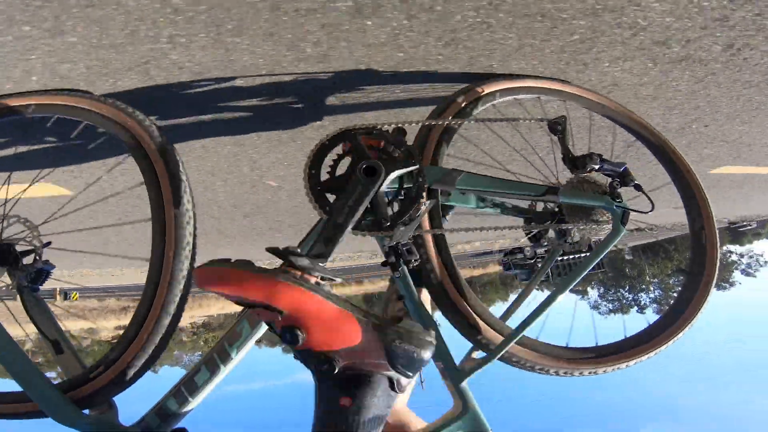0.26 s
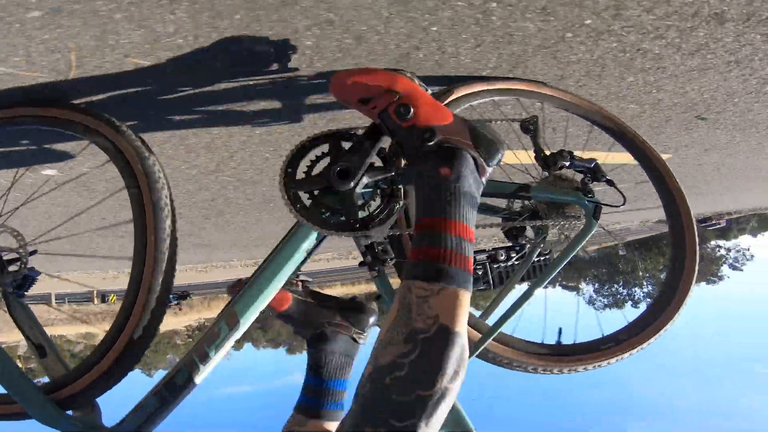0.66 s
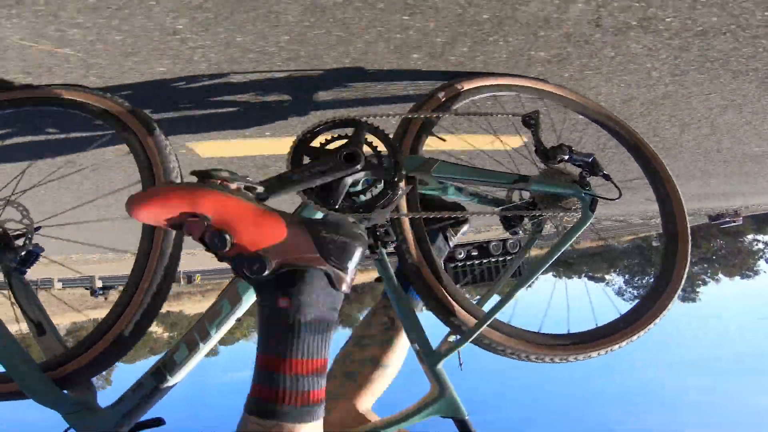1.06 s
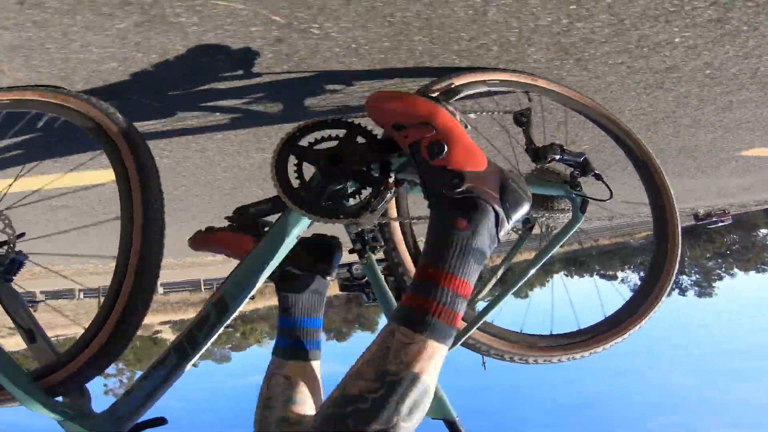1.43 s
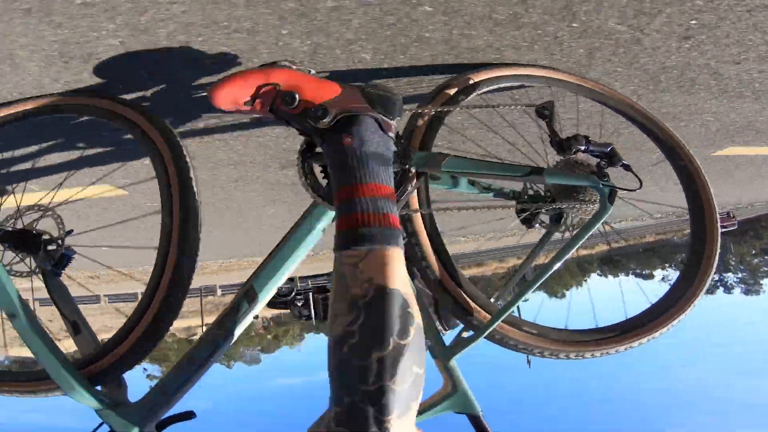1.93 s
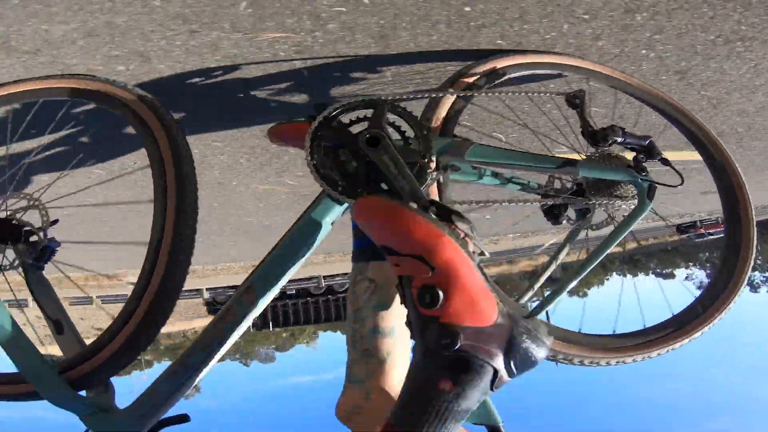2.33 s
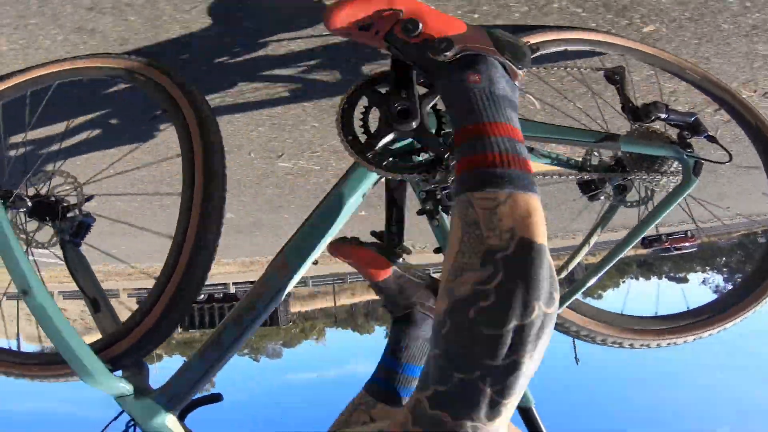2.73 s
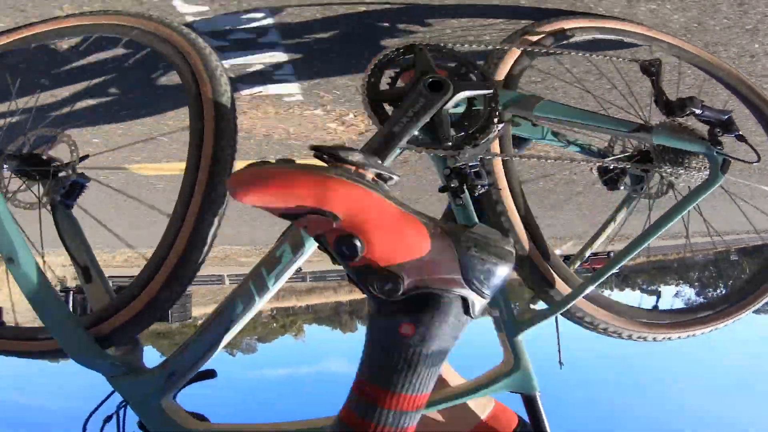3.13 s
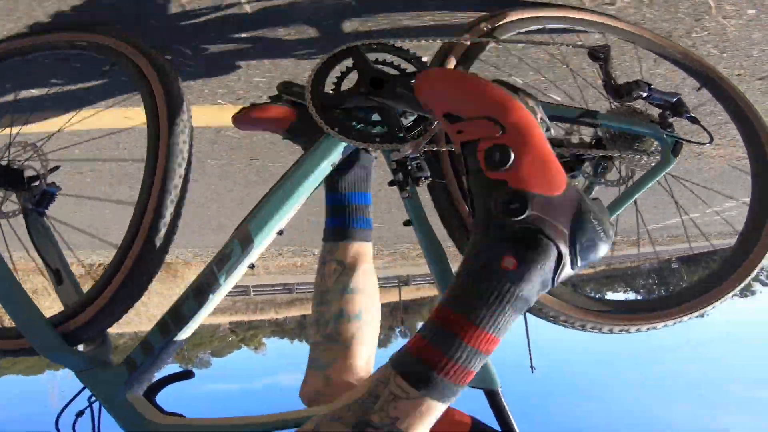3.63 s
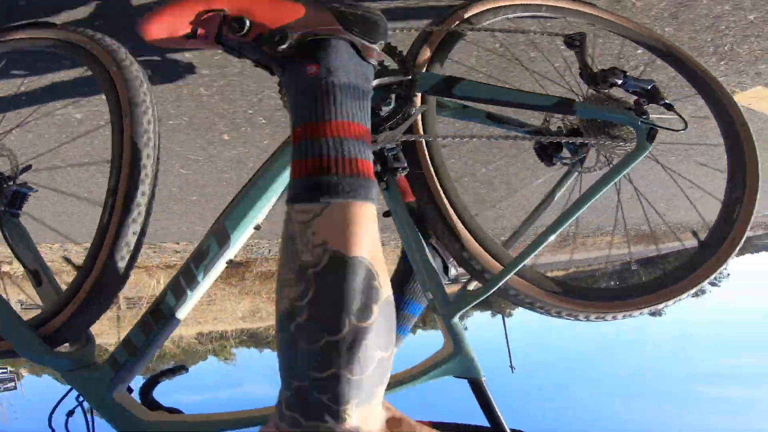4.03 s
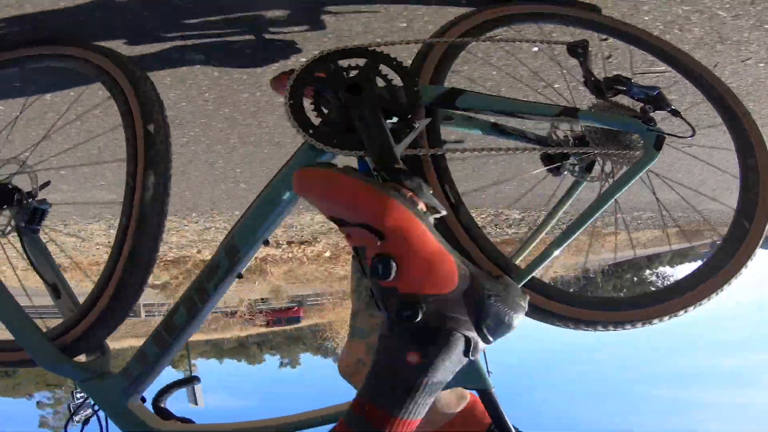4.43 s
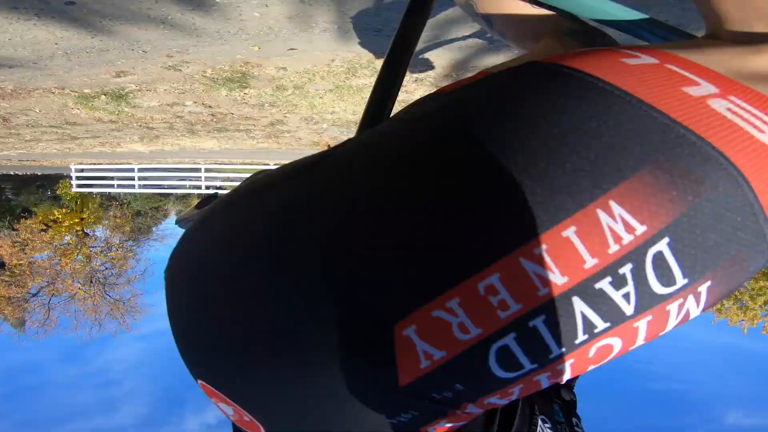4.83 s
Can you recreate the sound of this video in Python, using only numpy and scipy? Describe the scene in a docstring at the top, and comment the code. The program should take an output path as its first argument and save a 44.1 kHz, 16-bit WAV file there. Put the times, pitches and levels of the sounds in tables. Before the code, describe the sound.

Outdoors on a road, a twin-cylinder motorcycle drones loudly nearby, its pitch sagging slightly, then draws away and grows duller. Underneath, bicycle tyres give a quiet steady tread roar and gritty hiss, with small chain and grit ticks, busier after three seconds. Low gusts bump the small, wind-covered microphone on the bike. At the very end a click cuts the motorcycle off and full wind roars and thumps.

```python
"""A twin motorcycle with a narrow angle between its cylinders drones nearby and draws away: overtones, rush and puffs.
A bicycle rolls along an asphalt road: flickering noise makes the tread roar and hiss, short bursts its ticks.
Low noise swelling in gusts is the wind on the small microphone.
At the end the sound cuts with a click to full wind, roaring and thumping; the motorcycle stops at the cut."""
import sys
import numpy as np
from scipy import signal
from scipy.fft import rfft, irfft, next_fast_len
from scipy.io import wavfile
from scipy.ndimage import uniform_filter1d

SR = 44100
rng = np.random.default_rng(int(sys.argv[2]) if len(sys.argv) > 2 else 0)


def unload_audio(sound):
    """Save the sound as a 16-bit wav file, at the path given as the first command line argument."""
    columns = np.transpose(np.atleast_2d(sound))
    # keep every value between -1 and 1, then stretch to whole-number steps
    steps = np.round(np.clip(columns, -1, 1) * 32767)
    wavfile.write(sys.argv[1], SR, steps.astype(np.int16))


N = 223844  # length in samples
CUT_S = 4.9  # the sound cuts to full wind


def undb(db):
    """Turn decibels into a plain factor."""
    return 10 ** (np.asarray(db) / 20)


def level(x, db):
    """Scale a sound to a given average (rms) level in dB."""
    return x * undb(db) / np.sqrt(np.mean(x ** 2))


def columns(rows):
    """Draw every column after the time as a curve, one value a sample."""
    s, *rest = np.transpose(rows)
    return [np.interp(np.arange(N) / SR, s, c) for c in rest]


def walk(rate):
    """Random values held 1 / rate seconds, then smoothed twice; spread near 1."""
    hold = int(SR / rate)
    steps = np.repeat(rng.standard_normal(N // hold + 1), hold)
    smooth = uniform_filter1d(uniform_filter1d(steps, hold), hold)
    return 1.38 * smooth[:N]


def noise(points, flicker_db, rate):
    """Noise of a given spectrum whose half-octave bands flicker each on their own; rms 1."""
    hz, db = np.transpose(points)
    size = next_fast_len(N)
    octave = np.log2(np.maximum(np.arange(size // 2 + 1) * SR / size, 1))
    colour = undb(np.interp(octave, np.log2(hz), db, left=-90, right=-90))
    shaped = rfft(rng.standard_normal(size)) * colour
    out = 0
    for centre in np.arange(3.5, 14, .5):  # in octaves above 1 Hz
        window = np.cos(np.pi * np.clip(octave - centre, -.5, .5)) ** 2
        out = out + irfft(shaped * window, size)[:N] * undb(flicker_db * walk(rate))
    return level(out, 0)


def band(x, hz, width):
    """A resonance: keep what lies around one frequency."""
    return signal.lfilter(*signal.iirpeak(hz, hz / width, fs=SR), x)


def band_twice(x, hz, width):
    """Two equal resonances in a row, for steeper sides."""
    return band(band(x, hz, width), hz, width)


# Engine speed. Each row: time in seconds, engine cycles per second in Hz.
ENGINE_SPEED = [(0.0, 22.47), (0.3, 22.33), (0.7, 22.09), (1.1, 21.86), (1.4, 21.76), (1.9, 21.63),
                (2.5, 21.615), (3.5, 21.595), (4.3, 21.63), (4.9, 21.75)]
# Motorcycle drawing away. Each row: time in seconds, level in dB, distance from 0 (near) to 1 (far).
DRAWING_AWAY = [(0, -21, 0.0056), (0.7, -21, 0.087), (1.4, -22.5, 0.55), (2.1, -24, 0.72), (2.8, -25, 0.78),
                (3.0, -27, 0.9), (3.8, -29, 0.88), (4.3, -28.5, 1), (4.9, -31, 0.99)]
# Exhaust overtones heard near, midway and far.
# Each row: multiple of the engine cycle, strength in dB beside the other overtones.
NEAR_OVERTONES = [(1, -19.5), (2, -26), (3, -19), (4, 1), (5, -0.9), (6, -1), (7, -3), (8, -31), (9, -3.4),
                  (10, -12), (11, -8), (12, -10.5), (13, -8.5), (14, -12), (15, -26), (16, -20.5),
                  (17, -25.5), (18, -34), (19, -30), (20, -39.5), (21, -32), (22, -22.5), (23, -31.5),
                  (24, -33)]
MIDWAY_OVERTONES = [(1, -22.5), (2, -16), (3, -9.5), (4, 2), (5, 1), (6, -3.5), (7, -0.5), (8, -9),
                    (9, -0.05), (10, -23), (11, -15.5), (12, -9), (13, -8), (14, -13.5), (15, -26.5),
                    (16, -17.5), (17, -23), (18, -32.5), (19, -28), (20, -36.5), (21, -29), (22, -26.5),
                    (23, -31), (24, -31.5)]
FAR_OVERTONES = [(1, -6), (2, -9), (3, -8.5), (4, -6.5), (5, 1.5), (6, -5.5), (7, -1.5), (8, -1.5), (9, 0),
                 (10, -29.5), (11, -13), (12, -6.5), (13, -17.5), (14, -10), (15, -19.5), (16, -23.5),
                 (17, -33.5), (18, -27), (19, -28), (20, -28.5), (21, -18), (22, -31), (23, -31.5),
                 (24, -30)]
MIDWAY_AT = .7  # distance
# Noise of the exhaust. Each row: frequency in Hz, relative strength in dB per Hz.
RUSH_SPECTRUM = [(60, -10.5), (100, -8.5), (200, 2), (300, -9), (380, -26)]
# Rings of the silencer. Each row: frequency in Hz, width in Hz, level in dB before distance fades it.
SILENCER_RINGS = [(842, 32, -53), (1780, 290, -67)]
RING_FADE_DB = 16  # the silencer's ring is lost with distance
# Each pair from here on is (near, far). Place in the cycle and strength of the second firing:
SECOND_FIRING, SECOND_SHARE = (.458, .423), (.94, 1.01)
# strength and delay (cycles) of the pipe's return:
RETURN_SHARE, RETURN_CYCLES = (.61, .36), (.246, .226)
# lag of the low overtones (radians per log multiple), pulse turn (radians), lateness (cycles):
LOW_LAG, PULSE_TURN, LATE_CYCLES = (6.8, 4.43), (3.18, 1.6), (.108, .196)
FIRING_SCATTER_DB = (.5, .9)  # from firing to firing
PUFF_KICK = 1.0  # steady push of a puff beside its hiss


def motorcycle():
    """Two uneven firings a cycle: a stack of overtones, a rush between them, gas puffs that ring the silencer."""
    (hz,), (db, far) = columns(ENGINE_SPEED), columns(DRAWING_AWAY)
    far = np.clip(far, 0, 1)
    pairs = SECOND_FIRING, SECOND_SHARE, RETURN_SHARE, RETURN_CYCLES, LOW_LAG, PULSE_TURN, LATE_CYCLES
    second, share, back, delay, lag, twist, late = (a + far * (b - a) for a, b in pairs)
    unsteady = 1 + .0006 * walk(10)
    turn = np.cumsum(hz * unsteady) / SR - late  # engine cycles so far

    tone = 0
    for (k, near_db), (_, midway_db), (_, far_db) in zip(NEAR_OVERTONES, MIDWAY_OVERTONES, FAR_OVERTONES):
        pair = np.angle(1 + share * np.exp(-2j * np.pi * k * second))
        # each firing returns once along the pipe
        bounce = np.angle(1 + back * np.exp(-2j * np.pi * k * delay))
        # the high overtones leave first, the low ones trail
        spread = twist - lag * np.log(k) + .08 * walk(1.4)
        wobble_db = (.6 + 1.1 * far) * walk(4)
        strength_db = np.interp(far, (0, MIDWAY_AT, 1), (near_db, midway_db, far_db))
        wave = np.cos(2 * np.pi * k * turn + pair + bounce + spread)
        tone = tone + undb(strength_db + wobble_db) * wave
    # even out the loudness over half a second
    tone = tone / np.sqrt(uniform_filter1d(tone ** 2, SR // 2))
    tone = tone * undb(np.interp(far, (0, 1), FIRING_SCATTER_DB) * walk(2 * hz.mean()))
    # the rush stands out more with distance
    rush = undb(-19.0 + 6.7 * far) * noise(RUSH_SPECTRUM, 1.0, 3.6)

    puff = sum(g * np.exp(-((turn - at) % 1) / .04) for at, g in ((0, 1), (second, .6)))
    gas = puff * undb(1.4 * walk(40)) * rng.standard_normal(N)
    rings = 0
    for ring_hz, width, ring_db in SILENCER_RINGS:
        rings = rings + level(band_twice(gas + PUFF_KICK * puff, ring_hz, 1.2 * width), ring_db)
    rings = rings * undb(-RING_FADE_DB * far ** 4)
    rasp = level(band_twice(gas, 1500, 1800), -61.5)
    # the rasp follows the distance less than the drone does
    rasp = rasp * undb(0.41 * (db - db.mean()))
    heard = np.arange(N) < CUT_S * SR  # the motorcycle stops at the cut
    return heard * ((tone + rush) * undb(db) + rings + rasp)


# Tyres on asphalt. Each row: time in seconds, level of the roar in dB, level of the hiss in dB.
ROLLING = [(0.0, -43.5, -60), (0.7, -43.5, -59), (2.5, -45, -58.5), (3.4, -44, -57), (4.9, -44.5, -58)]
# Tread roar, then fine hiss. Each row: frequency in Hz, relative strength in dB per Hz.
ROAR_SPECTRUM = [(190, -19.5), (330, -0.5), (390, -2.5), (490, -6.5), (758, -9), (854, -7.5), (1080, -12.5),
                 (1200, -12), (1740, -19), (3000, -31), (3900, -49.5), (6600, -120)]
HISS_SPECTRUM = [(1470, -18), (2500, -2), (3070, -3.5), (3540, -0.5), (3840, 3), (4660, 0), (5810, -4),
                 (6780, -17), (8810, -37), (14900, -120)]
HUM_HZ, HUM_WIDTH_HZ = 585, 45
HUM_DB, HUM_RISE_DB_PER_S = -59, 3  # level halfway through, before it wavers
TREAD_HZ, TREAD_WIDTH_HZ = 1680, 570
TREAD_DB = -16  # crackle against the roar
TREAD_GRAIN_DB, TREAD_LARGEST = 3, 4  # size of a grain step; the biggest grain, in grain steps


def tyres():
    """Tread roar and crackle, a faint wavering hum and a fine gritty hiss, all from filtered noise."""
    roar_db, hiss_db = columns(ROLLING)
    # each grain of grit holds its random loudness for 40 samples
    grit = undb(1.4 * np.repeat(rng.exponential(size=N // 40 + 1), 40)[:N])
    hiss = level(noise(HISS_SPECTRUM, 0.96, 11) * grit, 0)

    hum = level(band_twice(rng.standard_normal(N), HUM_HZ, HUM_WIDTH_HZ), HUM_DB)
    from_middle_s = (np.arange(N) - N / 2) / SR
    hum = hum * undb(1.5 * walk(2) + HUM_RISE_DB_PER_S * from_middle_s)

    grain_sizes = np.minimum(rng.exponential(size=N // 60 + 1), TREAD_LARGEST)
    grains = undb(TREAD_GRAIN_DB * np.repeat(grain_sizes, 60)[:N]) * rng.standard_normal(N)
    crackle = level(band_twice(grains, TREAD_HZ, TREAD_WIDTH_HZ), TREAD_DB)
    roar = noise(ROAR_SPECTRUM, 1.3, 10)
    return hum + undb(roar_db) * (roar + crackle) + undb(hiss_db) * hiss


# Wind before the cut. Each row: frequency in Hz, relative strength in dB per Hz.
WIND_SPECTRUM = [(15, -17), (35, -5.5), (60, -0.5), (95, -5), (150, -11), (260, -25), (400, -43.5)]
BREEZE_DB, BREEZE_RISE_DB_PER_S = -42.5, 0.34  # wind between the gusts, level at the start and its rise
# Gusts on the microphone. Each row: time of the peak in seconds, strength added to the breeze in dB.
GUST_PEAKS = [(0.681, -28), (0.85, -39.5), (1.13, -34.5), (1.29, -35), (1.579, -42), (2.49, -32),
              (2.7, -35.5), (2.85, -28), (3.3, -30), (3.5, -37), (3.66, -28.5), (3.85, -30), (4.27, -35),
              (4.7, -34.5)]
GUST_RISE_S, GUST_FALL_S = 0.053, 0.12
# Full wind after the cut.
# Each row: time in seconds, level of the lows in dB, level of the middle in dB before crackle.
FULL_WIND = [(4.9, -36, -35), (4.92, -34, -33.5), (4.955, -30, -35), (4.98, -32, -32.5), (5.01, -31, -33),
             (5.04, -31, -35), (5.07, -30, -33)]
# Its lows and its middle. Each row: frequency in Hz, relative strength in dB per Hz.
FULL_WIND_LOW_SPECTRUM = [(25, -12), (65, 0), (110, -2), (200, -10), (320, -17), (500, -35)]
FULL_WIND_MIDDLE_SPECTRUM = [(180, -2), (300, 0), (600, -3), (1100, -9), (1700, -14.5), (2300, -23),
                             (3500, -40)]
FULL_WIND_RISE_S = .005
# Thumps of the wind on the microphone after the cut.
# Each row: start in seconds, starting strength in dB, pitch in Hz, seconds to die away by 60 dB.
WIND_THUMPS = [(4.9058, -16, 450, 0.03), (4.909, -15, 200, .08), (4.9355, -12, 100, 0.07),
               (4.950, -15, 75, .2), (4.980, -14, 230, 0.03), (5.0025, -13, 125, 0.12),
               (5.063, -19, 55, .15)]


def wind():
    """Slow eddies thump on the microphone port; after the cut full wind roars up into the middle, with thumps."""
    t = np.arange(N) / SR
    force = undb(BREEZE_DB + BREEZE_RISE_DB_PER_S * t)
    for s, db in GUST_PEAKS:
        width_s = np.where(t < s, GUST_RISE_S, GUST_FALL_S)
        force = force + undb(db) * np.exp(-((t - s) / width_s) ** 2)
    gusty = force * noise(WIND_SPECTRUM, 2.0, 14)

    low_db, middle_db = columns(FULL_WIND)
    crackle = undb(1.5 * walk(150))
    low = undb(low_db) * noise(FULL_WIND_LOW_SPECTRUM, 0.64, 25)
    middle = undb(middle_db) * crackle * noise(FULL_WIND_MIDDLE_SPECTRUM, 1.0, 33)
    full = np.clip((t - CUT_S) / FULL_WIND_RISE_S, 0, 1) * (low + middle)
    for s, db, hz, ring_s in WIND_THUMPS:
        after = np.maximum(t - s, 0)
        fade = np.exp(-np.log(1000) * after / ring_s)
        full = full - undb(db) * np.sin(2 * np.pi * hz * after) * fade
    return np.where(t < CUT_S, gusty, full)


# Chain and grit ticks; the row at 4.9082 s is instead the click of the cut.
# Each row: start in seconds, rough peak in dB before the wind cover dulls it, colour (strongest pitch) in Hz.
TICKS_AND_CUT_CLICK = [(0.635, -39.5, 3750), (1.8373, -36.5, 4070), (2.477, -38.5, 2550),
                       (2.7039, -42, 2620), (3.224, -40.5, 4100), (3.275, -33, 3842), (3.281, -37, 4500),
                       (3.302, -31.5, 2300), (3.31, -41, 4530), (3.381, -39.5, 5000), (3.413, -38, 4300),
                       (3.5388, -40, 3804), (3.583, -37, 3860), (3.7378, -32, 4070), (3.8335, -42, 4600),
                       (3.878, -40, 5130), (3.8932, -33, 4270), (4.1013, -37.5, 2700), (4.248, -39, 4400),
                       (4.258, -40, 4000), (4.276, -37.5, 3800), (4.4626, -39, 5600), (4.524, -44, 4540),
                       (4.753, -43, 4000), (4.8353, -37.5, 2660), (4.846, -33, 4800), (4.874, -40, 4500),
                       (4.887, -45, 5000), (4.898, -46, 5500), (4.9082, -40.5, 3900)]
FAINT_TICKS, FAINT_TICK_DB, FAINT_TICK_HZ = 40, -48, (3000, 5800)  # how many, middle peak, range of colours
TICK_RISE_S, TICK_SNAP_S = .0004, .002
TICK_TAIL_S, TICK_TAIL_DB = .04, -14  # time to die away by 60 dB, strength beside the snap
TICK_CREST = 1.6  # peak of a tick over its envelope


def ticks():
    """Each tick is a sharp snap and a short noisy tail, strongest around its colour; faint ones fall at random."""
    out, t = np.zeros(N), np.arange(3000) / SR
    when, size, colour = rng.random((FAINT_TICKS, 3)).T
    low_hz, high_hz = FAINT_TICK_HZ
    faint_db = FAINT_TICK_DB + 6 * (size - .5)
    faint = zip(when * CUT_S, faint_db, low_hz + colour * (high_hz - low_hz))

    snap = np.minimum(t / TICK_RISE_S, 1) * np.exp(-t / TICK_SNAP_S)
    tail = undb(TICK_TAIL_DB) * np.exp(-np.log(1000) * t / TICK_TAIL_S)
    shape = snap + tail
    for s, db, hz in TICKS_AND_CUT_CLICK + list(faint):
        burst = shape * rng.standard_normal(len(t))
        burst = band_twice(burst, hz, 1800) + 0.65 * band(burst, 3000, 5300)
        # give every burst the energy of its envelope, then its peak
        burst = burst * np.linalg.norm(shape) / np.linalg.norm(burst)
        burst = burst * undb(db) / TICK_CREST
        i = int(s * SR)
        out[i:i + len(t)] += burst[:N - i]
    return out


def scene():
    """Add up the sources on one channel; the wind cover dulls the top of motorcycle and ticks."""
    near = motorcycle() + ticks()
    near = signal.sosfilt(signal.butter(9, 6000, fs=SR, output="sos"), near)
    return (near + tyres() + wind())[None]


TOP_HZ = 11800


def record(dry):
    """A steep low-pass filter cuts the top of the whole sound."""
    return signal.sosfilt(signal.ellip(8, .2, 70, TOP_HZ, fs=SR, output="sos"), dry)


dry = scene()
out = record(dry)
unload_audio(out)
```